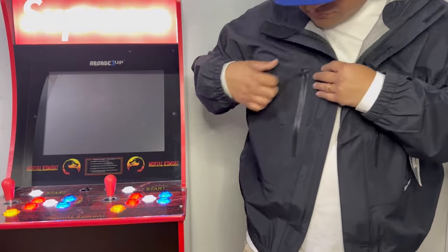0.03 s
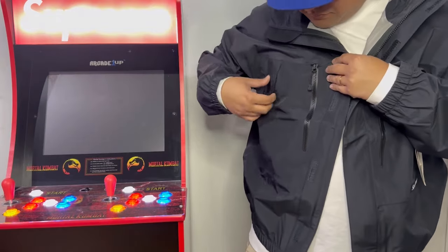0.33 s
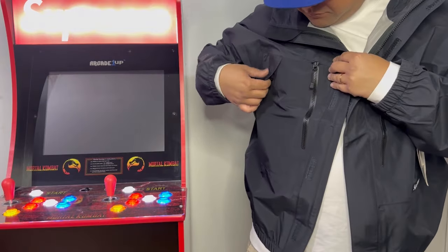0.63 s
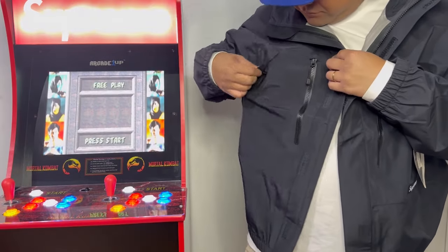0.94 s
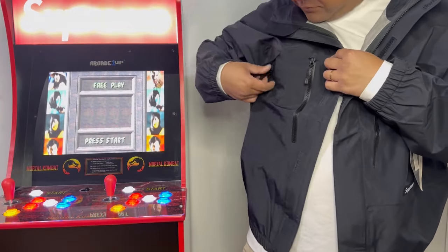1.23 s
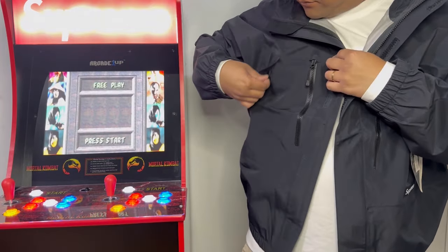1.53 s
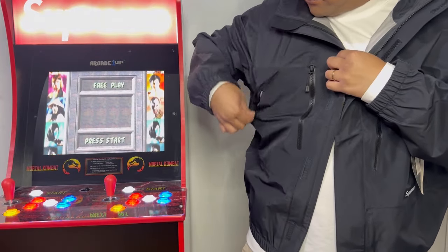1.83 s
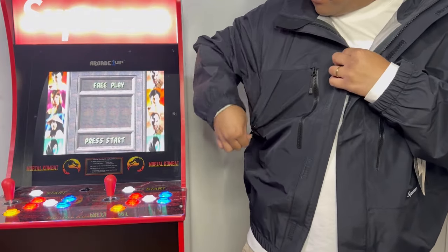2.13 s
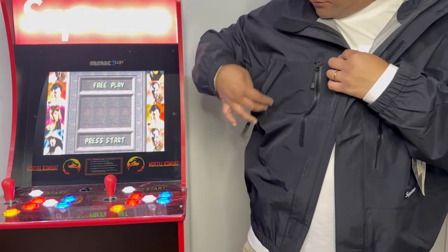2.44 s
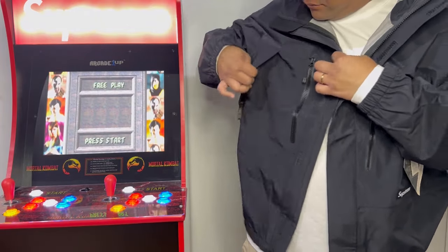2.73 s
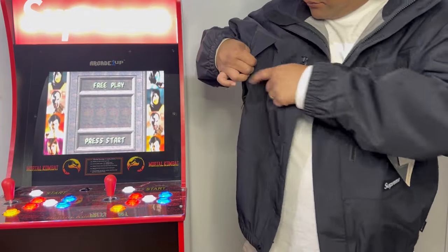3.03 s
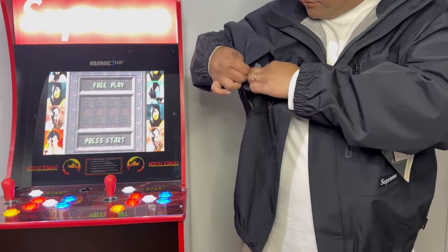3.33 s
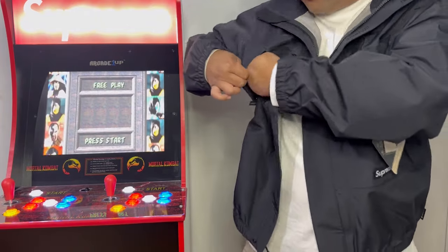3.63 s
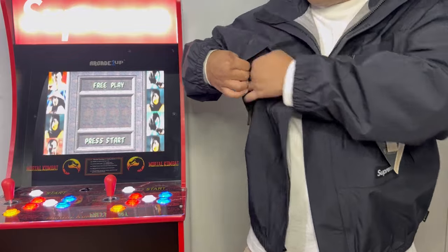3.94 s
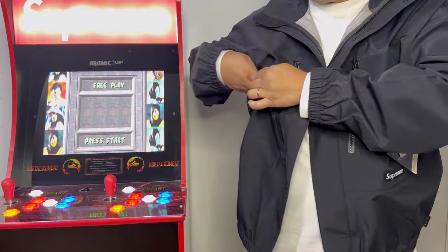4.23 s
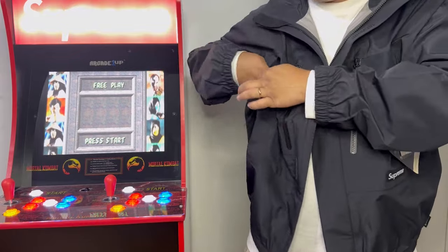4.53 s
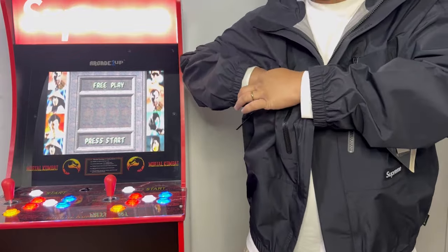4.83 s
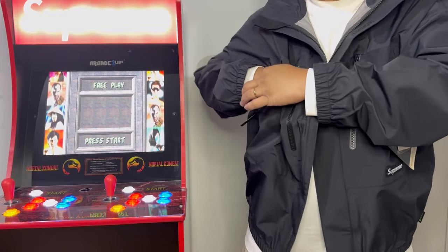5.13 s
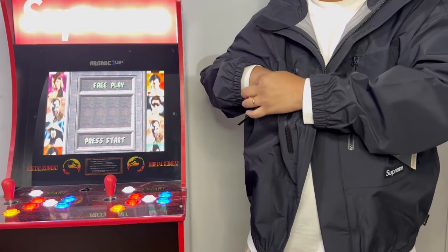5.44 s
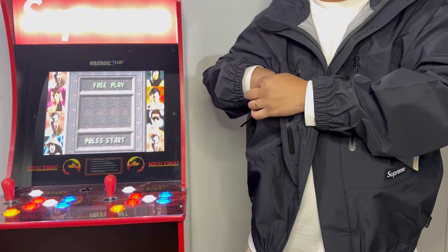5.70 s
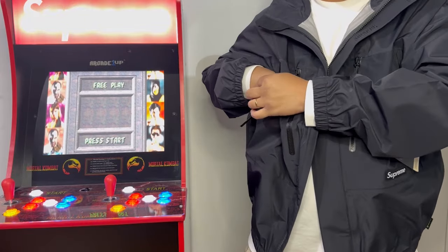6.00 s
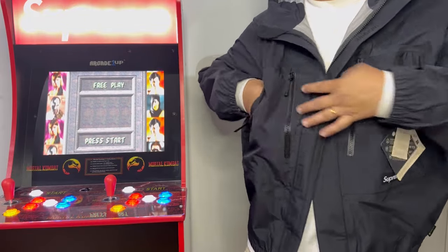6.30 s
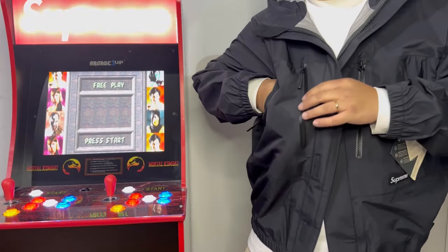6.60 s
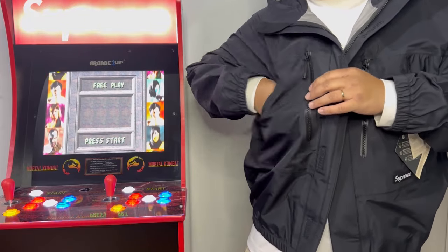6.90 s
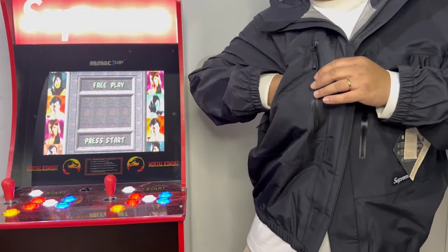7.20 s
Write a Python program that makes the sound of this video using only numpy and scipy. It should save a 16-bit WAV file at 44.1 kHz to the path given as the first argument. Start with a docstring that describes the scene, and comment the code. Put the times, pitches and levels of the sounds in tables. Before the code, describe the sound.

Hands work at a nylon jacket pocket, making scattered dry rustles, crinkles and soft thumps over a faint low hum.

```python
"""A small room, where hands work at the pocket of a nylon shell jacket, a step from a stereo microphone.
Cloth sliding on cloth hisses, the stiff shell crumples in tiny crackles, whole folds buckle and single
creases snap. Loose panels move a little air, trapped air pops, and a hand pushing into the pocket gives
soft thumps. A low mains hum runs underneath."""
import sys
import numpy as np
from scipy import signal
from scipy.fft import rfft, irfft
from scipy.io import wavfile

SR = 44100
rng = np.random.default_rng(int(sys.argv[2]) if len(sys.argv) > 2 else 0)


def int16_out(signal):
    """Quantize to a 16-bit WAV file."""
    q = np.round(np.clip(np.atleast_2d(signal).T, -1, 1) * 32767)
    wavfile.write(sys.argv[1], SR, q.astype(np.int16))


N = 320166
TIME = np.arange(N) / SR
TOP_HZ = 15850


def amp(db):
    """Decibels to gain."""
    return 10 ** (np.asarray(db) / 20)


def unit(x):
    """Scales to rms 1."""
    return x / np.sqrt(np.mean(x ** 2) + 1e-20)


def curve(rows):
    """A time table drawn out to every sample."""
    return np.interp(TIME, *np.transpose(rows))


def read(rows, hz, column=1):
    """One column of a frequency table, on a log axis."""
    rows = np.asarray(rows)
    return np.interp(np.log(hz + 1e-9), np.log(rows[:, 0]), rows[:, column])


def add(mix, s, sound):
    """Mixes a sound in at time s."""
    part = mix[max(round(s * SR), 0):][:len(sound)]
    part += sound[:len(part)]


def colour(x, spectrum, pitch=1, size=2048):
    """Minimum-phase EQ of unit energy; pitch multiplies the spectrum's frequencies."""
    log_gain = np.log(amp(read(spectrum, np.fft.rfftfreq(size, 1 / SR) / pitch)))
    mirrored = np.r_[log_gain, log_gain[-2:0:-1]]
    taps = np.fft.ifft(np.exp(np.conj(signal.hilbert(mirrored)))).real
    return signal.oaconvolve(x, taps / np.linalg.norm(taps))[:len(x)]


def wander(rate_hz):
    """Random drift of rms 1, up to about the given rate."""
    hz = np.fft.rfftfreq(N, 1 / SR)
    return unit(irfft(rfft(rng.standard_normal(N)) * np.exp(-(hz / rate_hz) ** 2), N))


# The stereo image. Each row: frequency in Hz, coherence, left's phase lead in radians, left over right in dB.
MIC_PAIR = [(100, .99, 0, 0), (400, .92, -.1, .5), (800, .64, -.3, 0), (1400, .72, -.6, -1.2),
            (2200, .74, 0, -.3), (3500, .52, .8, 0), (5000, .5, .8, 1.5), (5900, .2, 0, 1.3),
            (7000, .6, 1.8, 2.5), (8000, .82, 2.7, 3.7), (9500, .83, 1.1, .5), (11000, .95, 0, 0),
            (13000, .92, 0, 0), (14200, .75, -1.2, 0), (15800, .7, -2.3, 0)]
def stereo(a, b):
    """Two unrelated signals become a left-right pair with the likeness and phase of the microphones."""
    hz = np.fft.rfftfreq(len(a), 1 / SR)
    coherence = read(MIC_PAIR, hz)
    common = rfft(a) * np.sqrt((1 + coherence) / 2)
    apart = rfft(b) * np.sqrt((1 - coherence) / 2)
    lean = np.exp(1j * read(MIC_PAIR, hz, column=2) / 2) * amp(read(MIC_PAIR, hz, column=3) / 2)
    return irfft(np.array([(common + apart) * lean, (common - apart) / lean]), len(a))


# The room's decay. Each row: frequency in Hz, seconds to fall by 60 dB.
REVERB_TIMES = [(100, 0.56), (600, 0.24), (2000, 0.16), (6000, 0.19), (16000, 0.1)]
def tail(x, size=256):
    """Diffuse room sound: a noise tail whose bands die at their own speed."""
    hz, t, bands = signal.stft(rng.standard_normal(SR // 2), SR, nperseg=size)
    decay = amp(-60 * t / read(REVERB_TIMES, hz)[:, None])
    build_up = 1 - np.exp(-t / .004)
    taps = signal.istft(bands * decay * build_up, SR, nperseg=size)[1]
    return signal.oaconvolve(x, taps / np.linalg.norm(taps))[:N]


# Early reflections off the near walls. Each row: delay in seconds, gain.
WALL_ECHOES = [(.003, 0.11), (.0065, 0.23), (0.0131, .1)]
def room(x, wet_db, apart_db):
    """Direct sound, a few wall echoes and the tail; part of the tail differs between the microphones."""
    near = x.copy()
    for delay, gain in WALL_ECHOES:
        add(near, delay, gain * x)
    return stereo(near + amp(wet_db) * tail(x), amp(apart_db) * tail(x))


# The hum's fader. Each row: time in seconds, level in dB.
HUM_LEVEL = [(0, -59), (4.9, -61.5), (5.6, -70), (5.95, -65), (6.1, -65), (7.26, -63.5)]
# The tone of the room air. Each row: frequency in Hz, relative level in dB.
AIR_EQ = [(20, -27), (45, 13.5), (120, 5.5), (200, -20.5), (900, -33), (1600, -6.5), (2500, -11.5),
          (5500, -19), (6150, -9.5), (6800, -22.5), (16000, -58)]
def room_tone(hum_hz=58.6, air_db=-70):
    """A slightly wavering mains hum over faint room air."""
    level = amp(curve(HUM_LEVEL) + .7 * wander(8))
    hum = np.sqrt(2) * level * np.sin(2 * np.pi * hum_hz * TIME + .15 * wander(4))
    air = stereo(*[colour(rng.standard_normal(N), AIR_EQ) for _ in range(2)])
    return hum + amp(air_db) * air


# Body sway under the strokes, with one still moment. Each row: time in seconds, drive in dB.
BODY_SWAY = [(0, -66.5), (1.2, -68), (2.2, -68), (3.7, -63), (4.8, -65), (5.5, -69.5), (5.68, -86.5),
             (6.0, -86.5), (6.06, -62.5), (7.26, -60.5)]
# Arm and hand moves. Each row: start and length in seconds, sliding drive and bending drive in dB.
HAND_STROKES = [(-.03, 0.17, -57, -49), (0.313, 0.064, -61, -53.5), (0.45, 0.068, -66.5, -61.5),
                (.635, .04, -60, -79), (0.703, 0.13, -60.5, -62), (.8, 0.12, -64, -51),
                (0.909, 0.091, -59.5, -68), (1.07, 0.044, -68, -61), (1.22, 0.049, -86, -55.5),
                (1.292, .08, -59.5, -57), (1.543, .12, -64, -46.5), (1.69, 0.26, -63.5, -45),
                (1.964, 0.098, -57.5, -44), (2.222, 0.08, -67, -49), (2.412, 0.11, -68.5, -55),
                (2.595, 0.074, -68, -53), (2.745, 0.16, -64, -49.5), (2.881, 0.22, -64.5, -47),
                (3.193, 0.17, -66, -46.5), (3.376, 0.36, -60.5, -53.5), (3.458, 0.27, -60.5, -45),
                (3.816, 0.36, -60, -47), (4.28, .14, -61.5, -51.5), (4.416, .28, -57, -47),
                (4.683, 0.31, -64, -52.5), (5.015, .11, -83, -53), (6.019, 0.17, -60, -52),
                (6.181, 0.11, -52, -43.5), (6.298, 0.5, -66, -51), (6.416, 0.15, -60.5, -48.5),
                (6.69, 0.094, -60, -45), (6.826, 0.29, -66, -46.5), (7.137, 0.3, -77, -51.5)]
def movement(column, stop_s, sway_db=0, rise_s=.033, arch_db=1):
    """Drive in dB from one stroke column: each stroke gets going, is fastest midway, then runs out."""
    power = amp(curve(BODY_SWAY) + sway_db) ** 2
    for stroke in HAND_STROKES:
        start, length = stroke[:2]
        t = TIME[(TIME > start) & (TIME < start + 1)] - start
        arch = np.sin(np.pi * np.minimum(t / length, 1)) - .5
        envelope = np.minimum(t / rise_s, 1) * np.exp(-np.maximum(t - length, 0) / stop_s)
        add(power, start, (amp(stroke[column] + arch_db * arch) * envelope) ** 2)
    return 10 * np.log10(power)


# The low whoosh of moved air. Each row: frequency in Hz, relative level in dB.
BILLOW_EQ = [(25, -28), (60, 3.5), (130, -0.5), (250, -7), (400, -15.5), (800, -11), (3000, -40)]
def billowing(bend_db):
    """Loose panels wag as the shell bends and move a little air."""
    level = amp(-37 + .48 * bend_db)
    return stereo(*[level * colour(rng.standard_normal(N), BILLOW_EQ) for _ in range(2)])


# A hand bumping the jacket. Each row: start in seconds, peak in dB, pitch in Hz, length in seconds.
HAND_THUMPS = [(2.69, -50, 133, 0.066), (3.335, -55, 178, 0.029), (3.5, -48.5, 186, 0.055),
               (4.867, -38.5, 105, 0.044), (4.899, -39.5, 130, 0.032), (4.98, -40.5, 87, 0.027),
               (5.89, -60, 125, 0.081), (5.95, -63, 138, .06)]
# Hollow pops of air trapped in a fold, with the same columns.
AIR_POCKETS = [(.826, -40, 650, 0.014), (1.135, -46.5, 720, 0.0075), (2.922, -43.5, 670, 0.017),
               (2.975, -41.5, 850, .013), (4.018, -35.5, 650, 0.0073), (4.079, -41, 835, 0.0054),
               (6.972, -45, 784, 0.0041)]
def soft_pulses(rows):
    """Air and cloth pushed into a few rounded swings: a thump when low, a pop when higher and short."""
    out = np.zeros(N)
    for start, db, hz, length in rows:
        t = np.arange(0, length, 1 / SR)
        add(out, start, amp(db) * np.hanning(len(t)) * np.sin(2 * np.pi * hz * t))
    return out


def stick_slip(per_s, depth, fade_s):
    """A gain that jumps when the cloth lets go and then settles."""
    chance, size = rng.random((2, N))
    jumps = (chance < per_s / SR) * size ** 2
    return unit(1 + depth * signal.lfilter([1], [1, -np.exp(-1 / (fade_s * SR))], jumps))


# The hiss of nylon on nylon. Each row: frequency in Hz, relative level in dB.
HISS_EQ = [(100, -11), (300, -11.5), (700, -11.5), (1700, 2.5), (3000, 0), (4500, -1.5), (6300, -3),
           (8000, 2.5), (10000, 0), (11500, -6), (13000, -5), (15500, -3)]
def sliding(slide_db, grain_db=1.26, sheen_db=1.15, split_hz=7000):
    """Threads rub over threads: a grainy hiss that catches, lets go and shifts in brightness."""
    level = amp(slide_db + 4 + grain_db * wander(920)) * stick_slip(per_s=51, depth=.24, fade_s=.0066)
    sheen = amp(sheen_db * wander(23.7))
    hiss = np.array([colour(rng.standard_normal(N), HISS_EQ) for _ in range(2)])
    dull = signal.filtfilt(*signal.butter(2, split_hz, fs=SR), hiss)
    return stereo(*(level * (dull / sheen + (hiss - dull) * sheen)))


def crackle(spread_db, octaves, patchy_db=0, per_s=900):
    """Tiny buckles of many sizes ring in 16 bands; patchy_db lets pitches come and go as panels bend."""
    out, half_band = np.zeros(N), 2 ** (octaves / 2)
    knots = np.arange(0, TIME[-1], .016)
    for hz in np.geomspace(200, 10000, 16):
        chance, size, sign = rng.random((3, N))
        hits = chance < per_s * np.sqrt(hz / 1000) / SR  # per_s holds at 1 kHz; denser higher up
        clicks = np.zeros(N)
        clicks[hits] = np.sign(sign[hits] - .5) * amp(-spread_db * np.log(size[hits] + .04))
        clicks[hits] *= amp(patchy_db * np.interp(TIME[hits], knots, rng.standard_normal(len(knots))))
        band = signal.butter(2, [hz / half_band, min(hz * half_band, TOP_HZ)], "band", fs=SR)
        out += signal.lfilter(*band, unit(clicks))
    return unit(out)


# The tone of the crackle bed. Each row: frequency in Hz, relative level in dB.
CRUMPLE_EQ = [(100, -27), (300, -4.5), (450, -2), (650, -0.5), (1000, -3), (1200, -5), (1700, -6),
              (2200, -10), (3000, -14.5), (5000, -16), (9000, -23.5), (16000, -62)]
def crumpling(bend_db):
    """The shell crackles densely and in clumps as it bends, all over the jacket at once."""
    level = amp(bend_db - 8) * stick_slip(per_s=40, depth=1.1, fade_s=.0064)
    grains = [crackle(spread_db=1.6, octaves=.55, patchy_db=4) for _ in range(2)]
    return stereo(*[level * colour(layer, CRUMPLE_EQ) for layer in grains])


# The tone of one fold. Each row: multiple of the fold's pitch, relative level in dB.
FOLD_EQ = [(.1, -23), (.3, 5), (.62, 7), (1.15, 2), (1.7, 3), (2.3, -5), (3.5, -14.5), (6, -20),
           (16, -21.5)]
# The crunches. Each row: start in seconds, level in dB, attack and decay constant in seconds, pitch in Hz.
FOLD_HITS = [(.034, -53.5, 0.0032, 0.03, 840), (.448, -50, 0.0069, 0.014, 800),
             (.732, -54.5, 0.011, 0.037, 1050), (.805, -49.5, 0.0049, 0.016, 850),
             (.848, -44.5, 0.0029, 0.015, 3200), (.985, -57, 0.0027, 0.04, 980),
             (1.135, -50.5, 0.0019, 0.017, 750), (1.561, -45, 0.0042, 0.023, 1060),
             (1.728, -34, 0.0022, .04, 1080), (1.752, -44.5, 0.0037, 0.019, 1280),
             (1.818, -35.5, 0.014, 0.024, 1000), (1.885, -40, 0.035, 0.011, 816),
             (1.974, -42, 0.011, 0.059, 926), (2.015, -33.5, 0.018, 0.017, 1050),
             (2.085, -46.5, 0.026, 0.016, 990), (2.683, -48.5, 0.0027, 0.051, 930),
             (2.818, -49.5, 0.003, 0.015, 1310), (3.223, -43, 0.015, 0.016, 840),
             (3.28, -52, .022, 0.034, 1130), (3.563, -51, 0.042, 0.032, 1090),
             (4.012, -53, 0.0043, 0.01, 740), (4.079, -58, 0.0022, 0.006, 820),
             (4.14, -49, 0.019, 0.013, 1100), (4.28, -52, 0.0018, 0.022, 1180),
             (4.403, -44, 0.0035, 0.011, 1320), (4.475, -41, .0025, 0.019, 1150),
             (4.64, -48, 0.0043, 0.028, 1950), (6.226, -42.5, 0.0089, 0.019, 770),
             (6.697, -44, 0.0012, 0.013, 980), (6.881, -46, 0.021, 0.018, 1020),
             (6.964, -46, 0.0042, 0.0068, 880)]
def folds(puff_pitch=1.81):
    """A fold gives way in a swarm of crackles that swells and dies off, and shoves a puff of air."""
    grains = crackle(spread_db=5.3, octaves=1.14)
    out, t = np.zeros(N), TIME[:SR // 4]
    for start, db, attack, decay, hz in FOLD_HITS:
        envelope = np.minimum(t / attack, 1) * np.exp(-np.maximum(t - attack, 0) / decay)
        swarm = colour(np.roll(grains, -rng.integers(N))[:len(t)], FOLD_EQ, hz)
        puff = colour(rng.standard_normal(len(t)), BILLOW_EQ, puff_pitch)  # smaller than a panel, so higher
        shove = amp(-7) * (attack / .013) ** .21  # wide, slow folds shove more air
        add(out, start, amp(db) * envelope * (swarm + shove * puff))
    return out


def chance_creases(bend_db, per_s=18, centre_hz=1186, spread_octaves=.51):
    """Rows for lesser snaps at random moments, stronger the harder the shell is bent."""
    hits = rng.random(N) < per_s / SR
    pitches = centre_hz * 2 ** (spread_octaves * rng.standard_normal(hits.sum()))
    return list(zip(TIME[hits], bend_db[hits] + 10, pitches))


# The featured crease snaps. Each row: start in seconds, relative level in dB, pitch in Hz.
CREASE_HITS = [(.335, -41, 2000), (.364, -37, 1940), (.381, -32.5, 1990), (.804, -27.5, 1680),
               (.825, -28, 3000), (1.04, -37, 940), (1.562, -29, 1200), (1.577, -31, 1890),
               (1.619, -33, 1500), (1.671, -35, 2000), (1.71, -22.5, 3280), (1.722, -24, 1470),
               (1.731, -20, 1540), (1.976, -25.5, 1770), (1.986, -28, 2050), (2.003, -22, 1400),
               (2.1, -26.5, 1990), (2.115, -27, 1730), (2.288, -29.5, 1580), (2.616, -38.5, 1650),
               (2.819, -32, 1470), (3.221, -30.5, 1520), (3.238, -32.5, 1430), (3.302, -31, 1740),
               (4.08, -38, 800), (4.112, -35, 700), (4.645, -25, 1960), (5.511, -37.5, 1080),
               (5.75, -51.5, 920), (6.534, -27.5, 2700), (6.597, -27.5, 3160), (6.598, -30, 670)]
def snaps(rows, attack_cycles=.14, decay_cycles=.65, panel_ratio=.43, panel_gain=.13):
    """A crease flips: a sharp start and a few quick swings, while its panel flaps lower and longer."""
    out, t = np.zeros(N), TIME[:SR // 40]
    for start, db, hz in rows:
        cycles = np.outer([hz, hz * panel_ratio], t)
        envelope = (1 - np.exp(-cycles / attack_cycles)) * np.exp(-cycles / decay_cycles)
        flip, panel = envelope * np.sin(2 * np.pi * cycles)
        add(out, start, amp(db + 3.5) * (flip - panel_gain * panel))
    return out


def scene():
    """Dry rustle and thumps over the room tone; folds, snaps and pops also excite the room."""
    slide_db = movement(column=2, stop_s=.024)
    bend_db = movement(column=3, stop_s=.061, sway_db=5)  # the shell settles on after the sliding ends
    pops = snaps(CREASE_HITS + chance_creases(bend_db)) + soft_pulses(AIR_POCKETS)
    accents = room(folds(), wet_db=-8, apart_db=0) + room(pops, wet_db=-9, apart_db=4)
    rustle = crumpling(bend_db) + sliding(slide_db) + billowing(bend_db)
    return room_tone() + soft_pulses(HAND_THUMPS) + rustle + accents


def record(dry):
    """A steep low-pass takes off the very top."""
    low_pass = signal.firwin(511, TOP_HZ, window=("kaiser", 9), fs=SR)
    return signal.oaconvolve(dry, low_pass[None], "same")


dry = scene()
out = record(dry)
int16_out(out)
```